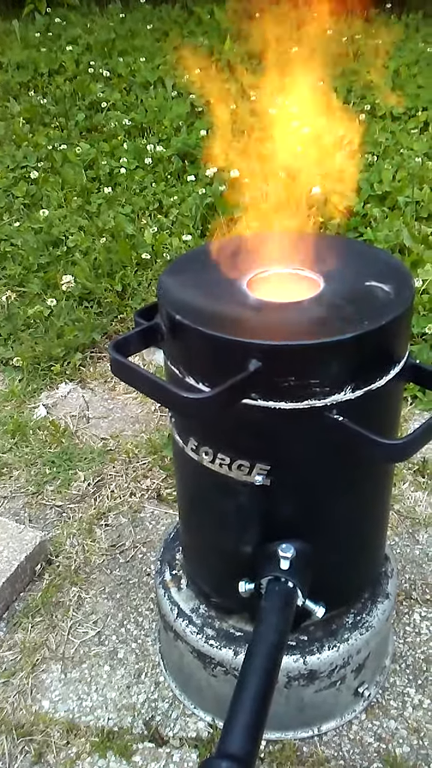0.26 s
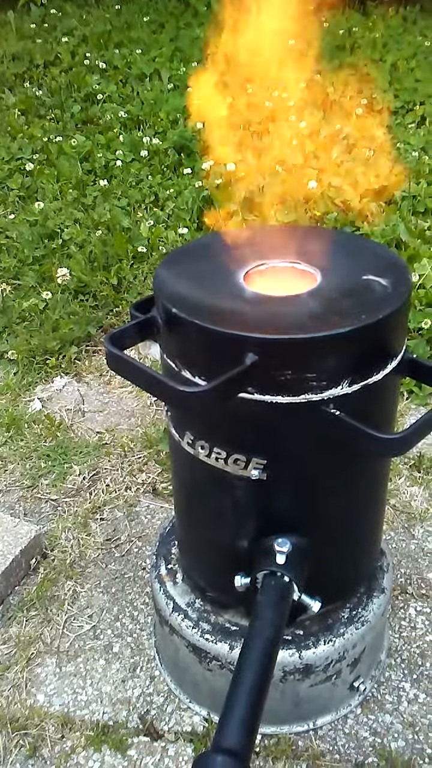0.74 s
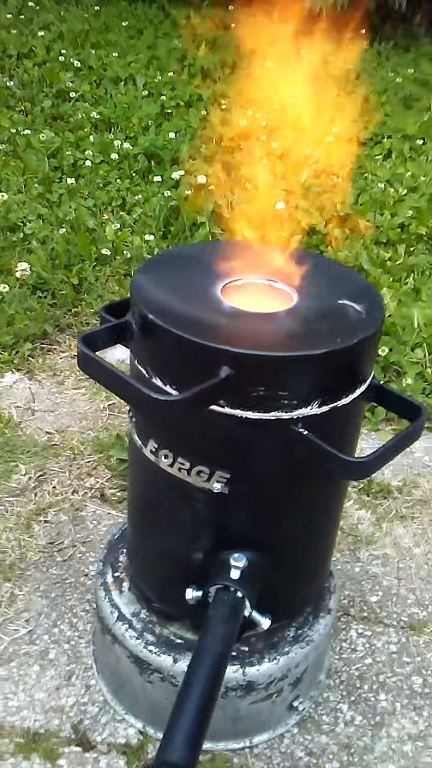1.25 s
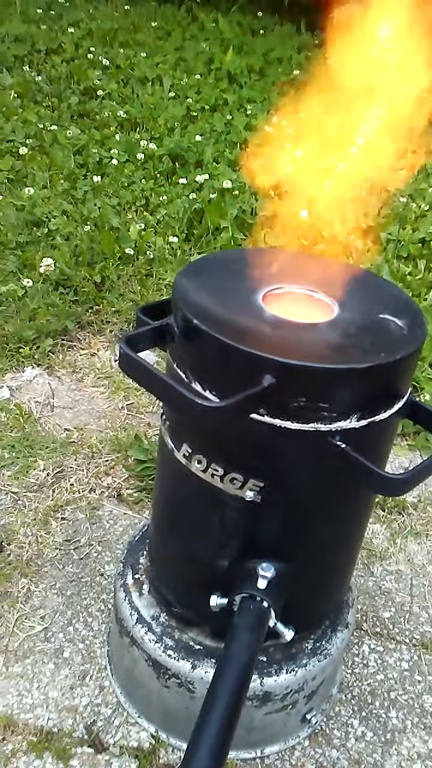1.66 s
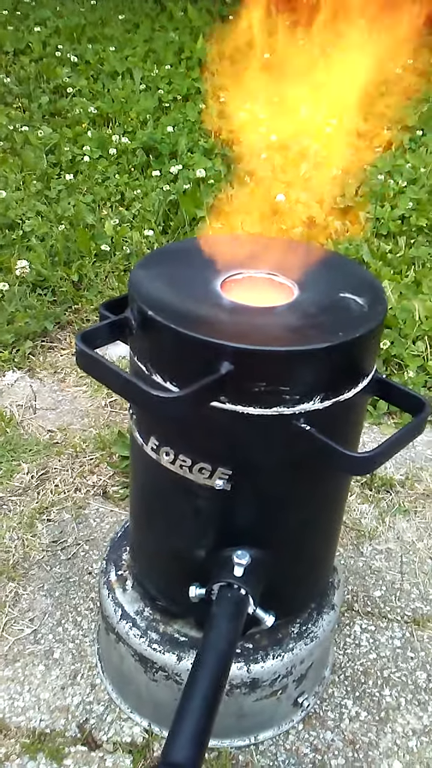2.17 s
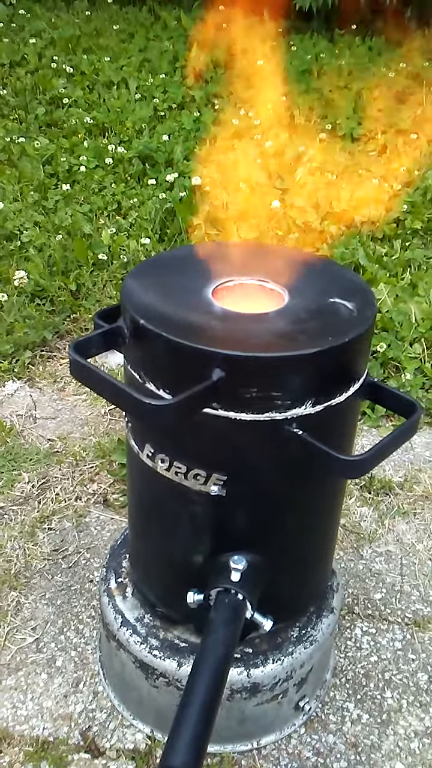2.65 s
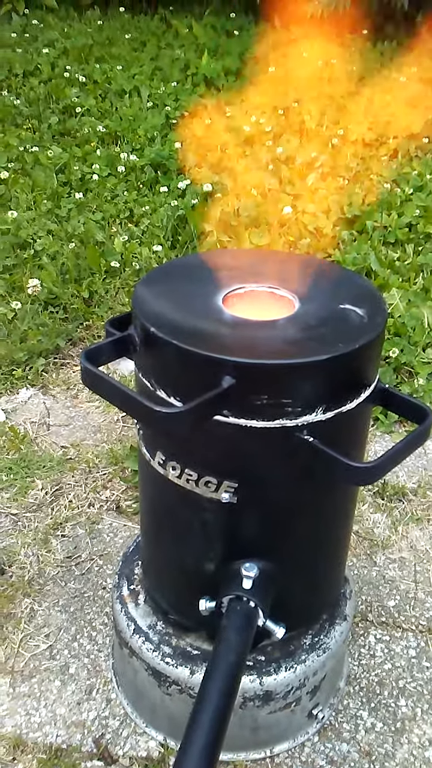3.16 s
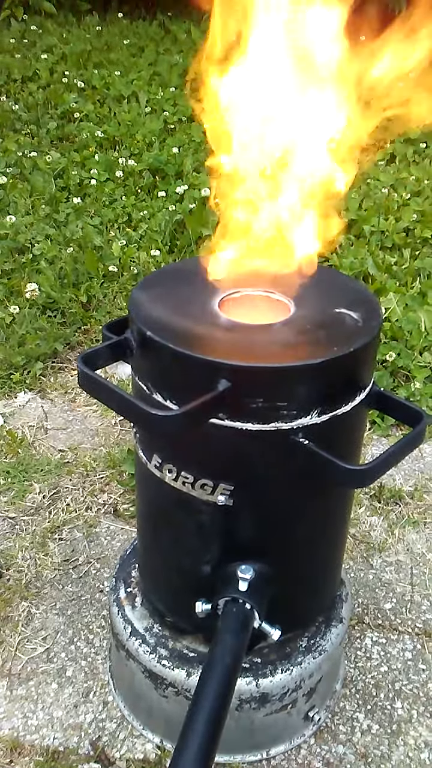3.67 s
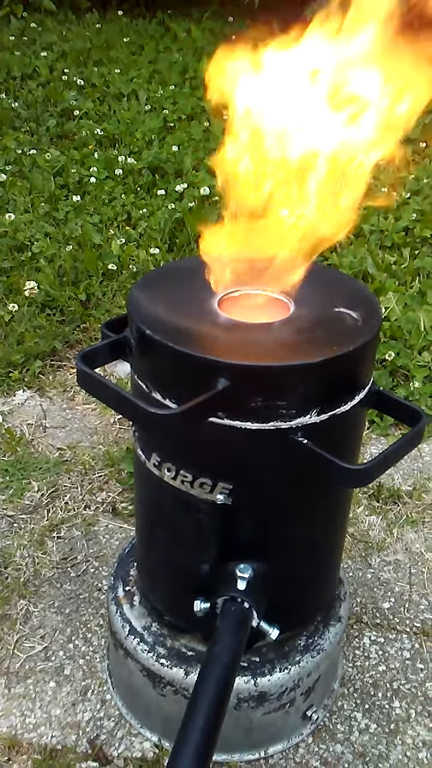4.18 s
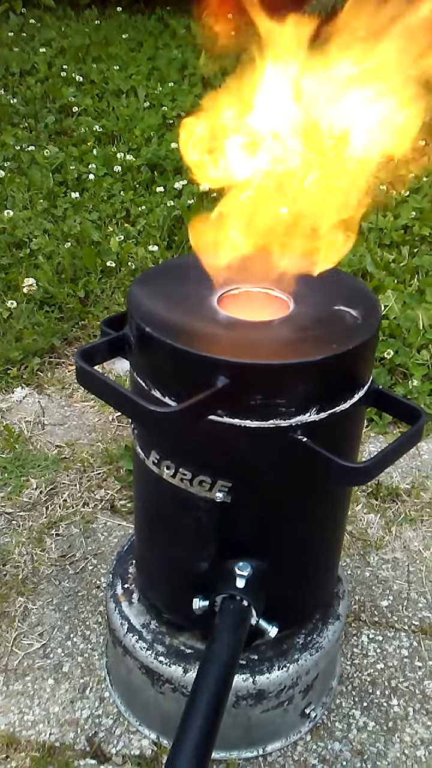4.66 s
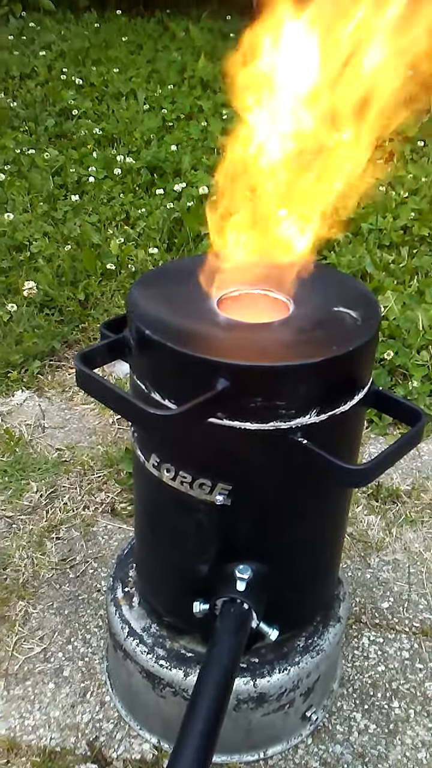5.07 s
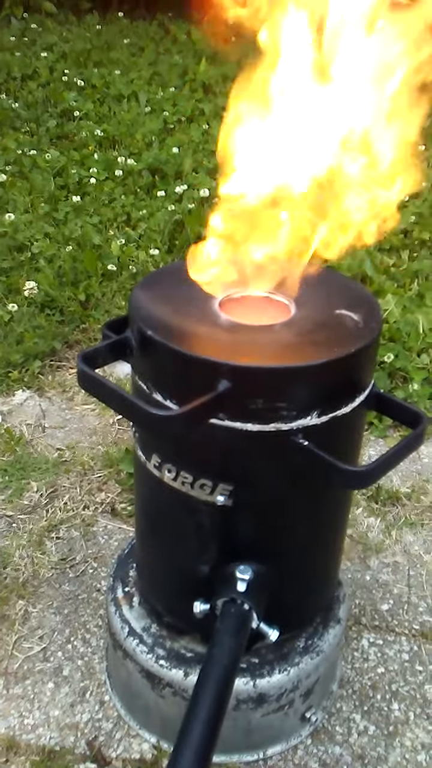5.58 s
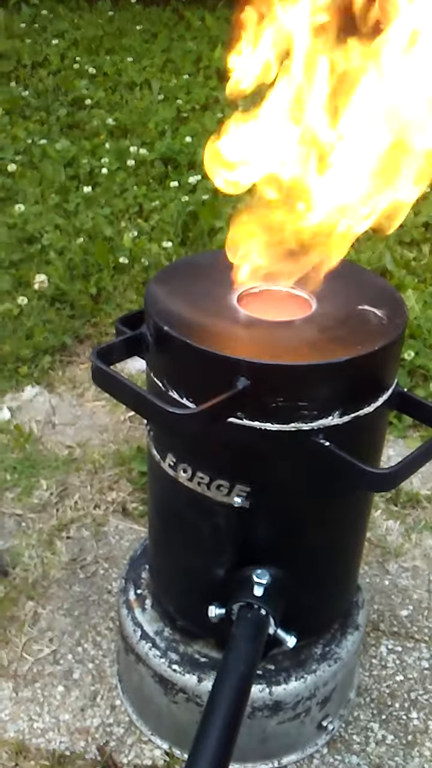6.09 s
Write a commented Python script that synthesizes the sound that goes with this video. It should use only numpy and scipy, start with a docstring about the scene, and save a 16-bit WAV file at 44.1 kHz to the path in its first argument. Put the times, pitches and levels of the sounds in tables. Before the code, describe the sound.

A propane flame burns in a small furnace in open air, dry and mono. From 0 s the roar climbs quickly; between 0.3 and 0.8 s it is at its loudest, a boomy low-mid blast with raspy tearing edges and a burst of hard, thumping pops, densest around 0.65 to 0.77 s. A few weaker pops follow at 0.9 and 1.1 s, with a last strong roar near 1.2 s before it collapses. A shorter, softer flare comes at about 2 s and a slow, weaker swell peaks near 3.3 s. What remains to about 6.3 s is a steady breathy rush of air through a resonant, slightly wavering tube, with soft low fluttering of the open flame and faint surges around 5 to 5.6 s. Above it, a bright gas hiss with faint whistles swells unevenly, notably near 1, 2, 3, 5 and 5.5 s.

```python
"""A propane flame roars and pops hard for a second in a small furnace outdoors, then sinks to a soft flutter.
Roar and the open plume at the lid's hole are coloured noise that follows one burn strength; large pops are
kicks at set times. Air rushes through the resonant burner tube, and the gas jet hisses above it in uneven
swells, some slow and some sudden. Place: open air, with no echo. Distance: none modelled; levels alone set
the balance. Microphone: mono."""
import sys
import numpy as np
from scipy import signal
from scipy.fft import rfft, irfft, next_fast_len
from scipy.io import wavfile
from scipy.ndimage import uniform_filter1d, minimum_filter1d, map_coordinates

SR = 44100
rng = np.random.default_rng(int(sys.argv[2]) if len(sys.argv) > 2 else 0)


def pcm_store(signal):
    """Save signal as 16-bit PCM."""
    levels = np.round(np.clip(np.atleast_2d(signal), -1, 1) * 32767)
    wavfile.write(sys.argv[1], SR, levels.astype(np.int16).T)


N = 279153

CALM_DB = -35  # roar of a calm burn, from which flutter, draught and tube pitch rise

# The flame builds up, then falls back, mostly weaker each time.
# Each row: crest in seconds, roar level in dB, build-up in dB per second.
FLARES = [(0.36, -14.3, 16), (0.79, -13, 9), (1.19, -14.5, 3.6), (1.95, -20.8, 18), (3.28, -27.8, 2.6),
          (4.95, -32.6, 3.6), (5.19, -34.5, 15), (5.6, -37.5, 30)]


def burn_strength():
    """Roar level in dB: the flame climbs to each flare, then collapses quickly to a low flame."""
    return surges(FLARES, fall_db_per_s=105, rest_db=-42.5)


# Colour of the flame booming in the furnace, also used by the pops.
# Each row: frequency in Hz, relative spectral level in dB.
ROAR_SPECTRUM = [(105, -43.5), (122, -22), (140, -8), (165, -7), (182, 0), (240, -4.5), (282, 0), (325, -6),
                 (343, -13.5), (368, -6), (470, -3.5), (540, -9), (750, -12.5), (900, -26.5)]


def flame(roar_db, churn):
    """Turbulent burning and countless small pops boom in the furnace."""
    pop_share = 0.29  # part of the power
    churn_db = 0.74  # rms
    turbulence = np.sqrt(1 - pop_share) * rng.standard_normal(N)
    small_pops = np.sqrt(pop_share) * sputter(rate=300, spread_db=2)
    boom = colour(turbulence + small_pops, ROAR_SPECTRUM)
    return amp(roar_db) * unit(amp(churn_db * churn) * boom)


# The loudest pockets of gas catching.
# Each row: start in seconds, peak level of the single pop in dB before the limiter.
LARGE_POPS = [(0.321, -14), (.348, -5), (0.45, -5.5), (.553, -20), (0.576, -15), (.636, -5), (0.682, -3),
              (0.725, -2.5), (0.765, -2.5), (0.911, -9), (1.104, -10), (1.149, -11)]


def pops():
    """Each large pocket of gas gives one pressure kick with the colour of the roar."""
    boom = colour(signal.unit_impulse(SR // 10), ROAR_SPECTRUM)
    kicks = np.zeros(N)
    for start, db in LARGE_POPS:
        kicks[round(start * SR)] = amp(db)
    return signal.fftconvolve(kicks, boom / np.abs(boom).max())[:N]


# Low flutter of the open flame.
# Each row: frequency in Hz, relative spectral level in dB.
PLUME_SPECTRUM = [(15, -35), (28, -34), (42, -10.5), (58, -1), (74, 0.5), (93, 1.5), (108, -3), (122, -22),
                  (200, -50)]


def plume(roar_db):
    """The open flame flaps with a low rumble that grows with the burn."""
    calm_flutter_db, flap_db = -45.8, 1.3  # level at a calm burn, rms of the flapping
    follow = 0.75  # dB of flutter per dB of roar
    flutter_db = calm_flutter_db + follow * (roar_db - CALM_DB) + flap_db * wobble(7)
    return amp(flutter_db) * colour(rng.standard_normal(N), PLUME_SPECTRUM)


# Broad rush of air in the tube, at a calm burn.
# Each row: frequency in Hz, relative spectral level in dB.
RUSH_SPECTRUM = [(100, -41), (300, -28), (560, -16), (740, -6.5), (900, -14), (1100, -9), (1350, -12.5),
                 (1550, -5.5), (2300, -1.5), (2750, -4), (3080, -10), (3700, -14), (4000, -16),
                 (4300, -50.5)]

# Rasp of hard burning, before the tube's pitch rises.
# Each row: frequency in Hz, relative spectral level in dB.
RASP_SPECTRUM = [(700, -18.5), (900, 6.5), (1150, 10), (1350, 0), (1600, -2.5), (1780, 8), (2200, -17),
                 (2510, 13.5), (2800, -8), (3100, -25), (3430, -0.5), (3680, -23), (4150, -45.5)]

# Resonances of the tube at a calm burn.
# Each row: centre in Hz, width in Hz, lift in dB.
TUBE_RESONANCES = [(1709.5, 154, 11.5), (2318, 110, 1), (2463, 93, 3), (2870, 140, 9.5), (3315, 210, 8)]


def tube(roar_db, churn):
    """Intake air and rasp excite the tube; a harder burn draws more air and raises its wavering resonances."""
    calm_air_db, air_follow = -23.55, 0.11  # level at a calm burn, dB of air per dB of roar
    stretch_per_db, waver = 0.001, 0.00302  # fractions of pitch: per dB of burn, rms
    rasp_db = -9.6  # relative to the roar
    churn_db, tear_db = 2.5, 3.0  # rms
    effort_db = roar_db - CALM_DB
    draught_db = calm_air_db + air_follow * effort_db

    # reading the coloured noise faster raises its pitch
    rise = 1 + stretch_per_db * np.maximum(effort_db, 0)
    position = np.cumsum(rise * (1 + waver * wobble(12)))

    def drifting(spectrum):
        """Noise through the tube, its pitch drifting with the burn."""
        noise = rng.standard_normal(N + SR // 2)
        return map_coordinates(colour(noise, spectrum, TUBE_RESONANCES), [position])

    air = amp(draught_db + 0.47 * wobble(70)) * drifting(RUSH_SPECTRUM)
    # hard burning tears the rush into short bursts
    tearing = amp(churn_db * churn + tear_db * wobble(200))
    rasp = amp(roar_db + rasp_db) * unit(tearing * drifting(RASP_SPECTRUM))
    return air + rasp


# Body of the jet's hiss, its bright crest and its finest part.
# Each row: frequency in Hz, relative spectral level in dB.
HISS_BODY_SPECTRUM = [(4700, -43.5), (5050, -12.5), (5400, -17.5), (5750, -3), (6400, 1.5), (6800, -10.5),
                      (7150, -1), (8300, -3.5), (9000, -16.5)]
HISS_CREST_SPECTRUM = [(7800, -18), (8600, -9), (9000, -2), (9500, 0.5), (10300, -0.5), (11100, -13),
                       (12000, -33)]
SIZZLE_SPECTRUM = [(10500, -44), (11600, -9.5), (12300, -8), (12700, -0.5), (13300, -18), (14200, -12),
                   (14900, -17), (15600, -7), (16000, -22)]

# Narrow whistles of the gas nozzle.
# Each row: centre in Hz, width in Hz, lift in dB.
NOZZLE_WHISTLES = [(6357, 100, 7), (7150, 90, 4), (7420, 70, 5), (7700, 130, 7), (8394, 80, 5),
                   (8645, 100, 4), (9594, 120, 6), (9946, 100, 6), (12141, 80, 6), (12543, 80, 10)]

# The gas hiss swells and fades; the levels are before its fast unrest.
# Each row: crest in seconds, hiss level in dB, fine sizzle level in dB, build-up in dB per second.
HISS_SWELLS = [(0.96, -38.2, -40, 9), (1.44, -46.5, -46, 2), (2.0, -43.3, -41.4, 23), (2.35, -54, -50, 1.1),
               (2.97, -38.8, -43.2, 22), (3.66, -45, -56, 21), (5.02, -38.9, -44.1, 7),
               (5.53, -40, -48, 29), (5.62, -49, -45.5, 44), (6.24, -45.5, -43.5, 72)]


def jet():
    """Propane leaves the nozzle with a shifting hiss and faint whistles; a stronger hiss is brighter."""
    body_db, body_follow = -5.7, 0.6  # offset of the body, its dB per dB of hiss
    usual_db = -45  # hiss level around which the body follows
    fade_db_per_s = 41
    hiss_rows = [(crest, db, climb) for crest, db, _, climb in HISS_SWELLS]
    sizzle_rows = [(crest, db, climb) for crest, _, db, climb in HISS_SWELLS]
    hiss_db = surges(hiss_rows, fade_db_per_s, rest_db=-52)
    sizzle_db = surges(sizzle_rows, fade_db_per_s, rest_db=-62)
    unrest_db = .5 * wobble(15) + .7 * wobble(90)

    def hiss(spectrum, db):
        """One band of jet noise with whistles and a wandering colour."""
        noise = colour(rng.standard_normal(N), spectrum, NOZZLE_WHISTLES)
        return amp(db + unrest_db) * patches(noise, depth_db=1.3)

    body = hiss(HISS_BODY_SPECTRUM, usual_db + body_follow * (hiss_db - usual_db) + body_db)
    crest = hiss(HISS_CREST_SPECTRUM, hiss_db)
    sizzle = hiss(SIZZLE_SPECTRUM, sizzle_db + .8 * wobble(70))
    return body + crest + sizzle


def surges(rows, fall_db_per_s, rest_db):
    """Level in dB: each surge climbs steadily to its crest and falls away; the strongest one prevails."""
    t = np.arange(N) / SR
    level = np.full(N, float(rest_db))
    for crest, db, climb in rows:
        before, after = np.maximum(crest - t, 0), np.maximum(t - crest, 0)
        level = np.maximum(level, db - climb * before - fall_db_per_s * after)
    return level


def sputter(rate, spread_db):
    """Small pockets of gas catch at random moments, rate a second on average, with uneven sizes."""
    chance, size = rng.random(N), rng.standard_normal(N)
    return unit((chance < rate / SR) * amp(spread_db * np.clip(size, -2, 2)))


def patches(x, depth_db, size=7):
    """The colour of x wanders: a random gain, smooth over some hundred Hz and tenths of a second."""
    bins = signal.stft(x, nperseg=512)[2]
    field = rng.standard_normal(bins.shape)
    for _ in range(2):
        field = uniform_filter1d(field, size=size, axis=0)  # across frequency
        field = uniform_filter1d(field, size=50, axis=1)  # across time
    return unit(signal.istft(bins * amp(depth_db * unit(field)), nperseg=512)[1][:N])


def colour(x, spectrum, resonances=()):
    """Causal filter, output at rms 1: a broad spectrum that falls away at its ends, lifted at each resonance."""
    size = next_fast_len(len(x) + SR // 4)
    hz = np.maximum(np.fft.rfftfreq(size, 1 / SR), 1)
    points, levels = np.transpose(spectrum)
    octaves_outside = np.abs(np.log2(hz / np.clip(hz, points[0], points[-1])))
    db = np.interp(np.log(hz), np.log(points), levels)
    db = db - 60 * np.minimum(octaves_outside, 1)
    for centre, width, lift in resonances:
        db = db + lift / (1 + (2 * (hz - centre) / width) ** 2)
    # folding the cepstrum makes the filter ring only after its input
    cepstrum = irfft(np.log(amp(db)), size)
    cepstrum[1:size // 2] *= 2
    cepstrum[size // 2 + 1:] = 0
    response = np.exp(rfft(cepstrum))
    return unit(irfft(rfft(x, size) * response, size)[:len(x)])


def wobble(rate):
    """A smooth random curve at rms 1, rate knots a second."""
    knots = rng.standard_normal(int(N * rate / SR) + 4)
    return unit(map_coordinates(knots, [np.arange(N) * rate / SR]))


def amp(db):
    """Decibels to gain."""
    return 10 ** (np.asarray(db) / 20)


def unit(x):
    """x at rms 1."""
    return x / np.sqrt(np.mean(x ** 2) + 1e-20)


def scene():
    """Furnace, tube and jet in open air; the burn strength and one churning motion drive flame and tube."""
    roar_db = burn_strength()
    churn = wobble(70)
    mono = flame(roar_db, churn) + pops() + plume(roar_db) + tube(roar_db, churn) + jet()
    return mono[None]


def record(dry):
    """A smooth look-ahead limiter holds the loudest peaks; a steep low-pass then cuts the top."""
    top_hz = 15750
    needed = np.minimum(1, .95 / (np.abs(dry) + 1e-9))
    gain = minimum_filter1d(needed, size=SR // 100)
    for _ in range(2):
        gain = uniform_filter1d(gain, size=SR // 200)
    size = next_fast_len(N + SR // 4)
    passed = np.fft.rfftfreq(size, 1 / SR) < top_hz
    return irfft(rfft(gain * dry, size) * passed, size)[:, :N]


dry = scene()
out = record(dry)
pcm_store(out)
```